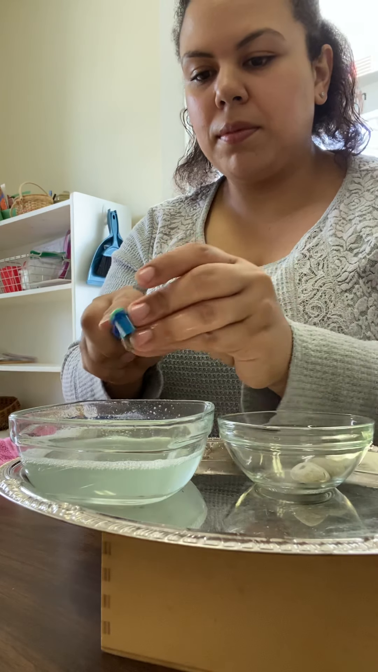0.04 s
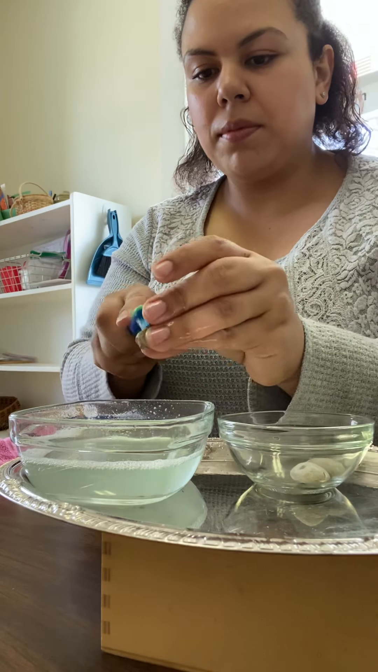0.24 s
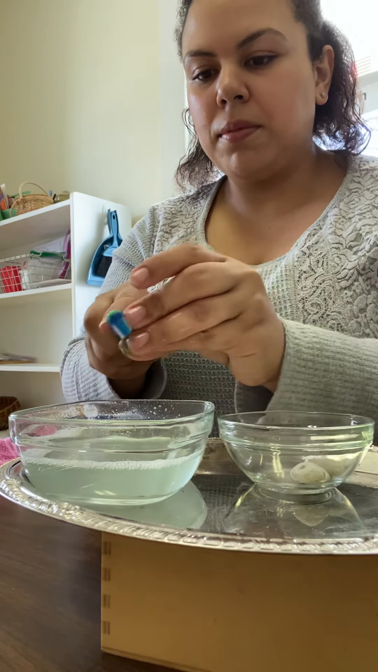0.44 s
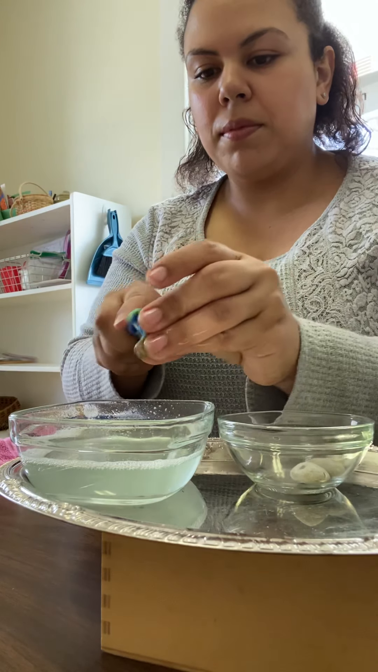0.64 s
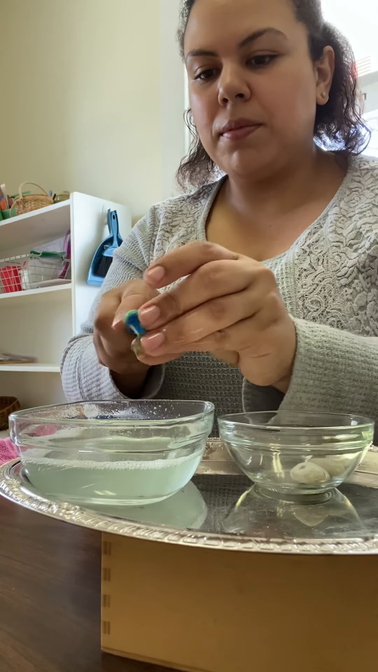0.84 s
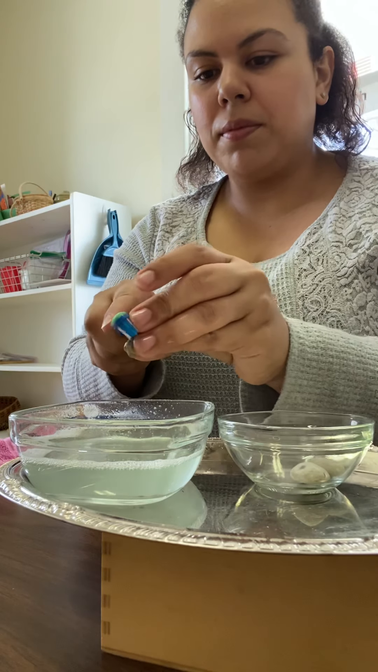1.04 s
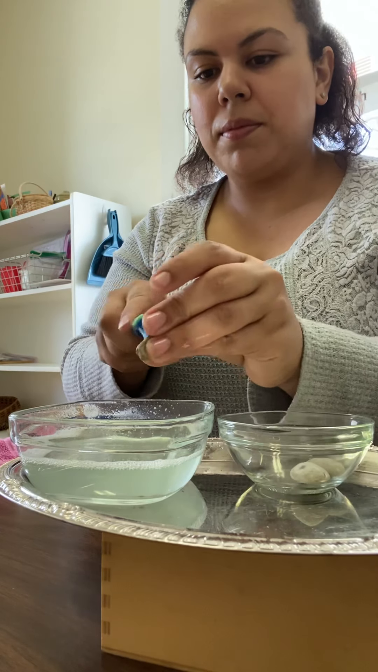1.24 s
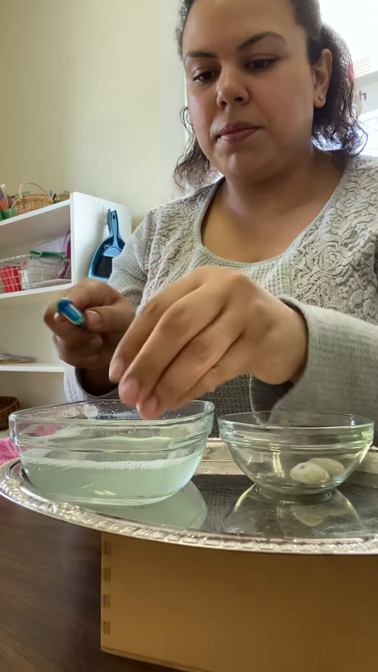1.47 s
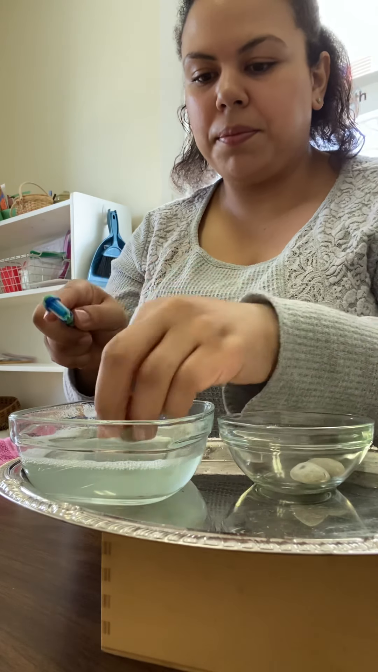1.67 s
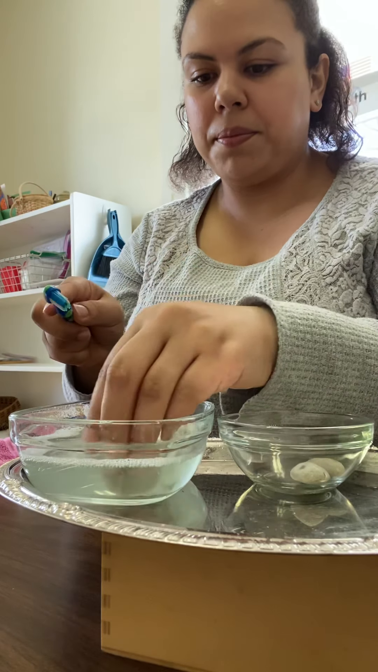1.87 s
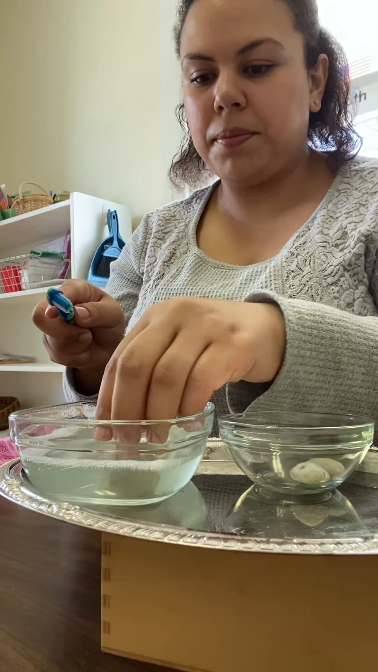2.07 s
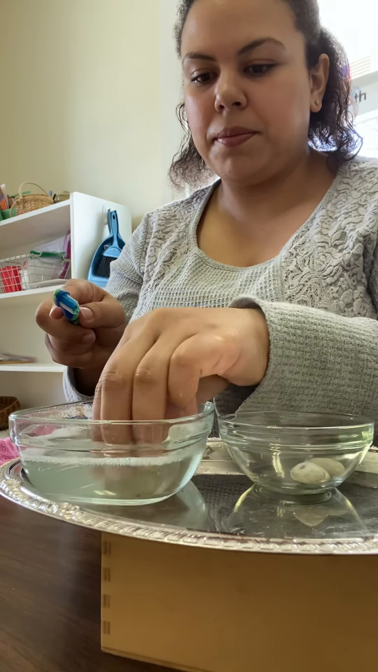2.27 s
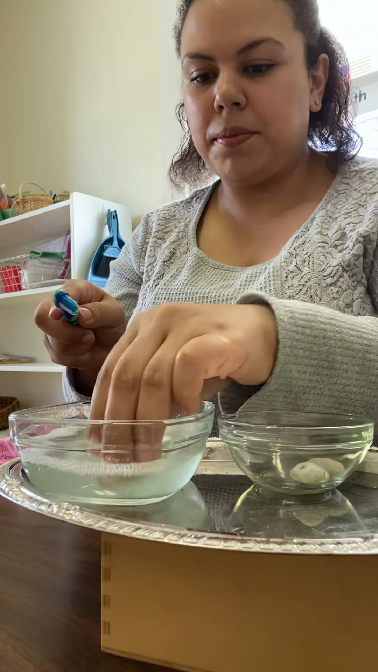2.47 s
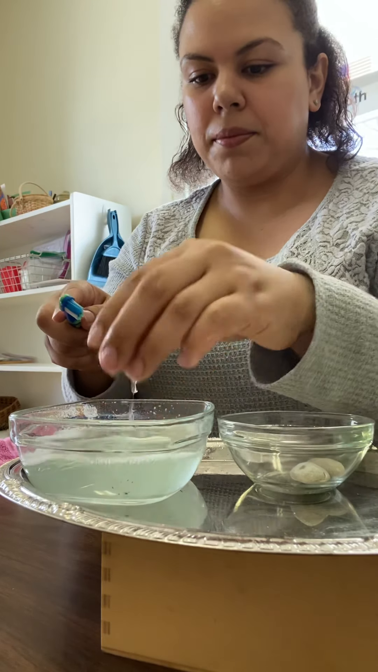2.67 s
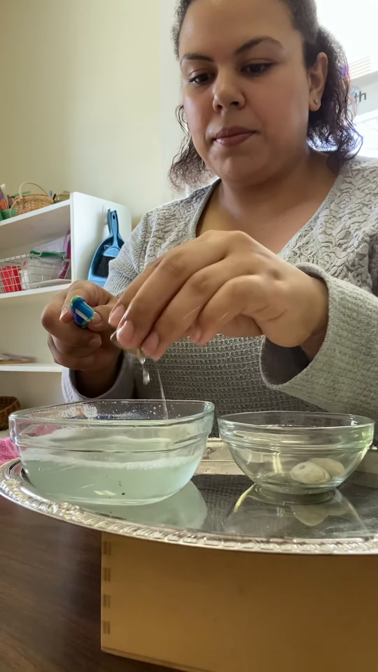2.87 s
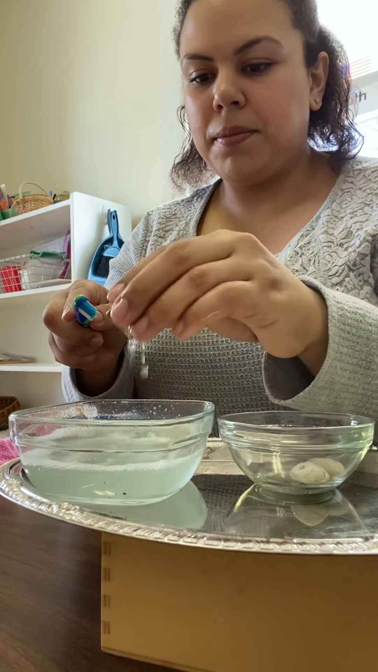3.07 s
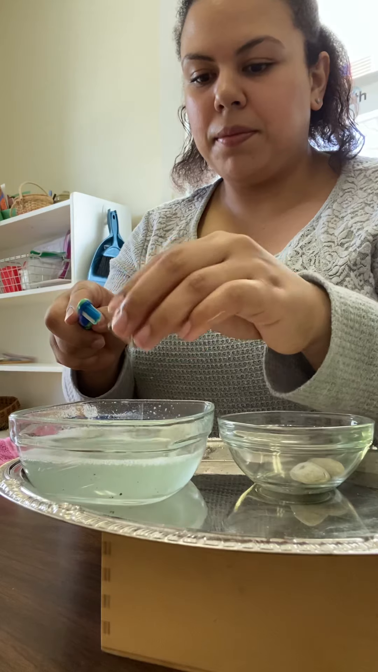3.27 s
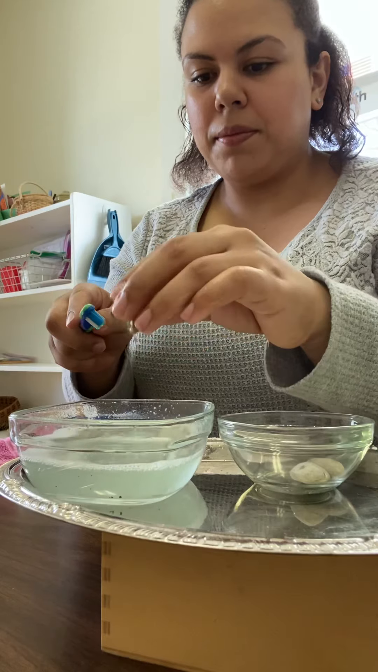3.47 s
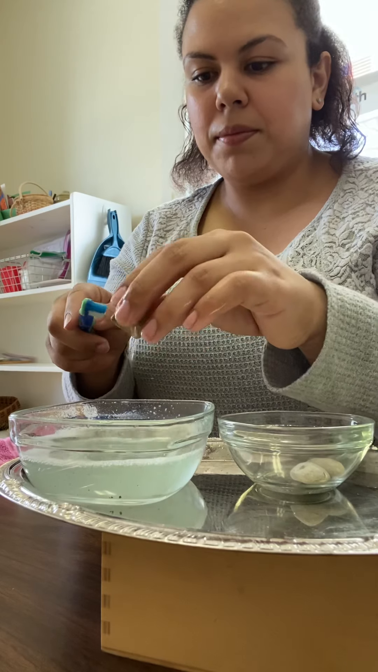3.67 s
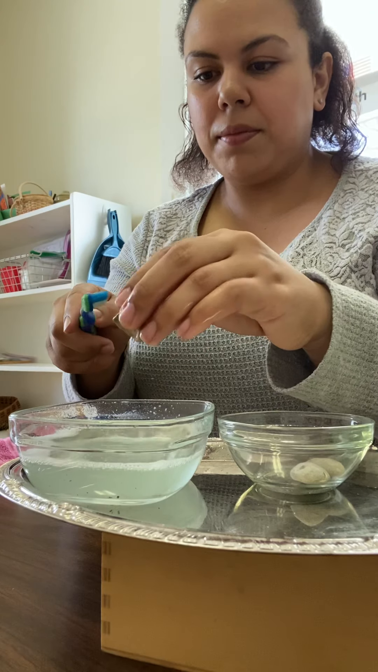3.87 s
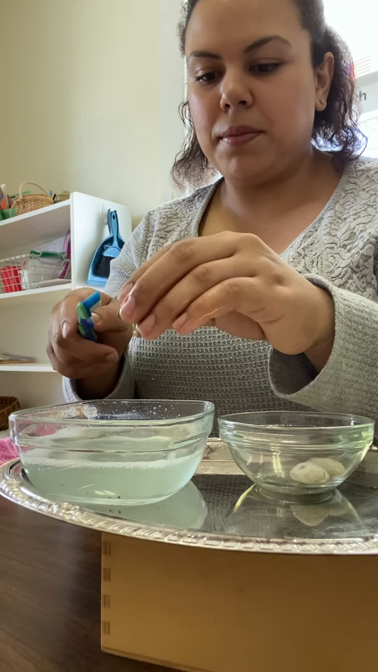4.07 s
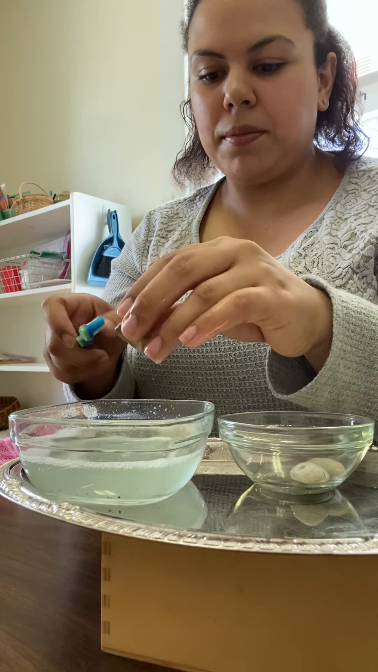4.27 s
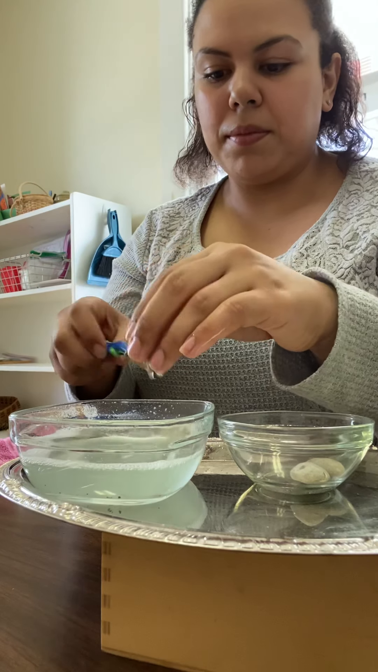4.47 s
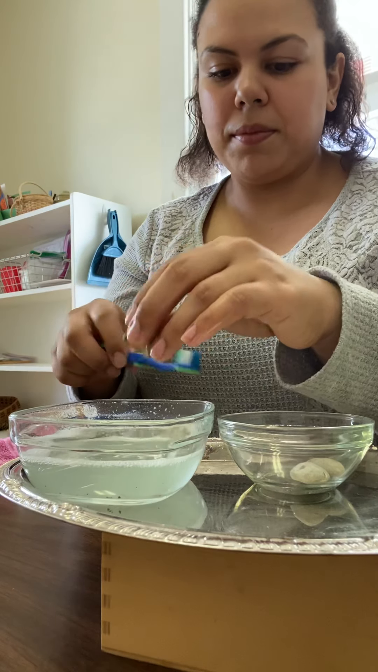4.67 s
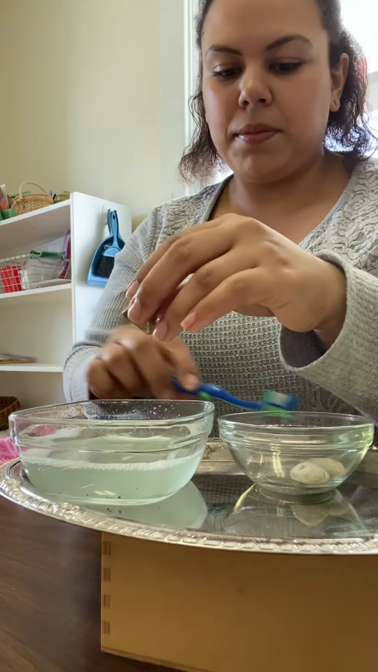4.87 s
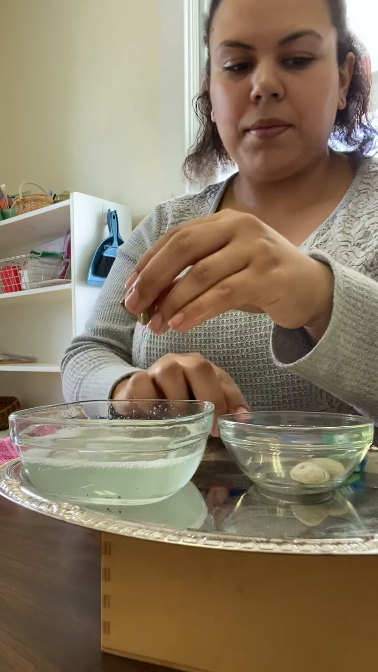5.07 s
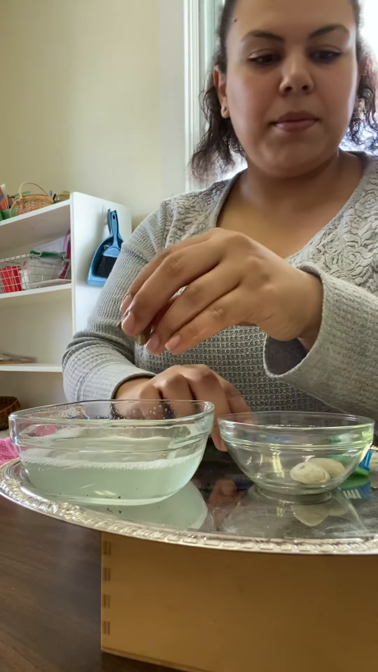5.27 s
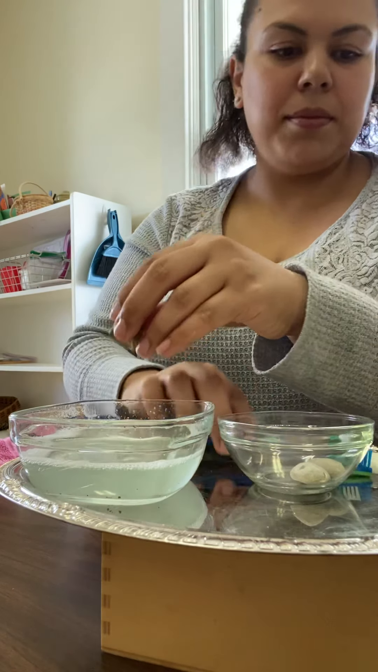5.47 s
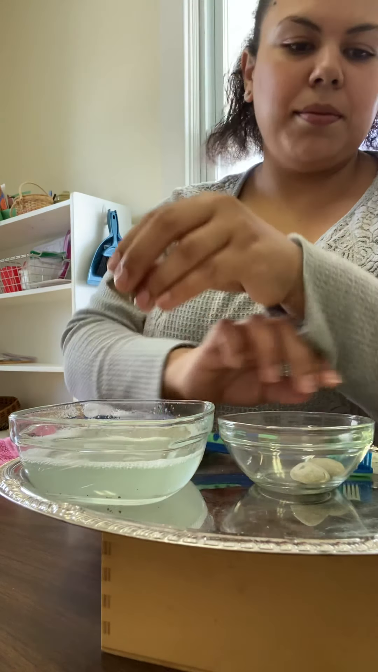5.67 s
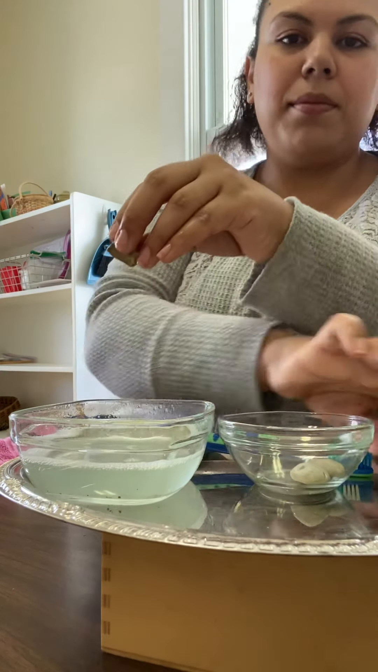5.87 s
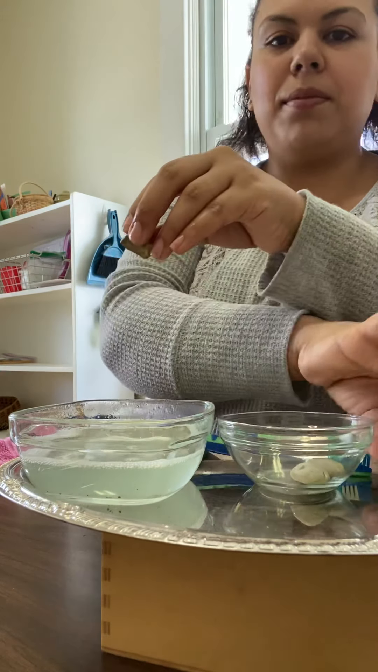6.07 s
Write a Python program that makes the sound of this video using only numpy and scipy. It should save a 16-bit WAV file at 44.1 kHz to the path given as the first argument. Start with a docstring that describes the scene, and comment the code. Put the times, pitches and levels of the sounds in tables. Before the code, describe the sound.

A quiet indoor tabletop heard closely in stereo, with slight room reverberation. From 0 to 1.35 s a wet toothbrush scrubs a small rock: about nine quick alternating strokes, airy bristle hiss with a faint stony rasp. At 1.73 s the rock clinks brightly on a glass bowl, a weaker tap at 1.8, then a rapid chatter from 1.93 to 2.0 and faint taps until 2.35. Water heaves low and small bubbles rise, fading by 2.5. Tiny drips tick at 2.7 and a crisper one at 2.9. A distant engine revs up from 2.7, holds around 4 to 5, then eases, over a growing low rumble. At 4.97 the plastic brush clacks loudly on a ringing metal tray, with rattles, then thuddy knocks at 5.35 and 5.5. A sleeve swishes and rubs from 5.8 to the end. A barely audible swish pulses each second.

```python
"""A wet toothbrush scrubs a small rock in quick strokes, close by in a small room: shaped friction grains.
The rock clinks on a glass bowl (decaying modes, clicks) as water heaves and bubbles (noise, rising sines).
Drips tick; the brush lands on a metal tray (modes, thuds, clacks); a sleeve slides away (friction grains).
Under it: a distant engine (sine orders through resonances), a rumble that grows and faint air (noise),
and a faint noise swish once a second."""
import sys
import numpy as np
from scipy import signal
from scipy.fft import rfft, irfft, next_fast_len
from scipy.io import wavfile
from scipy.ndimage import uniform_filter1d

SR = 44100
rng = np.random.default_rng(int(sys.argv[2]) if len(sys.argv) > 2 else 0)


def to_wav(s):
    """Save 16-bit WAV."""
    ch = np.atleast_2d(s).T  # columns
    pcm = np.round(np.clip(ch, -1, 1) * 32767)  # PCM
    wavfile.write(sys.argv[1], SR, pcm.astype(np.int16))


N = 270333  # samples


def amp(db):
    """Decibels to gain."""
    return 10 ** (np.asarray(db) / 20)


def unit(x):
    """Scale to rms 1."""
    return x / np.sqrt(np.mean(x ** 2) + 1e-20)


def along(points, hz):
    """Read (f/Hz, value) points on a log frequency axis."""
    f, v = np.transpose(points)
    return np.interp(np.log(hz + 1), np.log(f + 1), v)


def curves(rows):
    """One value per sample for each column after the time."""
    s, *cols = np.transpose(rows)
    return [np.interp(np.arange(N) / SR, s, c) for c in cols]


def ramp(start_s, length_s):
    """A straight rise from 0 to 1."""
    return np.clip((np.arange(N) / SR - start_s) / length_s, 0, 1)


def stroke(start_s, length_s, peak):
    """Speed of a sliding movement: up to 1 at the share `peak` of its length, then back to rest."""
    progress = (np.arange(N) / SR - start_s) / length_s
    half_turns = np.interp(progress, [0, np.clip(peak, .1, .9), 1], [0, .5, 1])
    return np.abs(np.sin(np.pi * half_turns))


def wobble(rows, size, per_second):
    """Random curves, straight between normally distributed knots."""
    knots = rng.standard_normal((rows, int(size * per_second / SR) + 4))
    at = np.arange(size) * per_second / SR
    return np.array([np.interp(at, np.arange(len(k)), k) for k in knots])


def filtered(x, response):
    """Multiply the spectrum of x by a response of frequency."""
    n = x.shape[-1]
    m = next_fast_len(n + SR // 8)
    return irfft(rfft(x, m) * response(np.fft.rfftfreq(m, 1 / SR)), m)[..., :n]


def colour(x, spectrum):
    """Shape x by a relative spectrum, at rms 1."""
    return unit(filtered(x, lambda hz: amp(along(spectrum, hz))))


def stress(x, centre_hz, boost_db, octaves):
    """Favour the resonances near one frequency, at rms 1."""
    def bump(hz):
        distance = np.log2((hz + 1) / centre_hz) / octaves
        return amp(boost_db * np.exp(-distance ** 2))
    return unit(filtered(x, bump))


def noise(spectrum, size, alike=0):
    """Coloured stereo noise with a given left-right likeness."""
    share = np.clip(alike, 0, 1)
    common = np.sqrt(share) * rng.standard_normal(size)
    separate = np.sqrt(1 - share) * rng.standard_normal((2, size))
    return colour(common + separate, spectrum)


def grains(spectrum, per_second, smooth):
    """Friction: tiny flicks of random size over finer ones; their colour shifts from spot to spot."""
    flicks = (rng.random(N) < per_second / SR) * rng.standard_normal((2, N))
    z = signal.stft(unit(flicks) + smooth * rng.standard_normal((2, N)), nperseg=256)[2]
    spots = uniform_filter1d(rng.standard_normal(z.shape[1:]), size=4, axis=0)  # over frequency
    spots = uniform_filter1d(spots, size=20, axis=1)  # over time
    patchy_db = 2.0
    patchy = signal.istft(z * amp(patchy_db * unit(spots)), nperseg=256)[1]
    return colour(patchy[:, :N], spectrum)


def ring(modes, t, tilt_db, damping, waver):
    """Modes struck at new strengths; whatever rests on them damps them and makes their phases waver."""
    hz, db, t60 = np.transpose(modes)[:, :, None]
    level = db + tilt_db * np.log2(hz / np.median(hz)) + rng.standard_normal(hz.shape)
    phase = 2 * np.pi * rng.random(hz.shape) + waver * hz / hz[-1] * wobble(len(hz), len(t), per_second=160)
    # radians each way; long waves reach both microphones more alike
    apart = np.minimum(hz / 1000, 1) * rng.uniform(0.17, 1.0, hz.shape) * rng.choice([-1, 1], hz.shape)
    wave = amp(level - 60 * t * damping / t60) * np.exp(1j * (2 * np.pi * hz * t + phase))
    return (np.exp(1j * np.array([[1], [-1]]) * apart.T) @ wave).imag


def add(track, s, sound):
    """Mix a sound in at time s."""
    part = track[:, round(s * SR):][:, :sound.shape[1]]
    part += sound[:, :part.shape[1]]


def room(x, wet_db):
    """Direct sound plus the walls' answer 4 ms later: noise decaying at its own rate in each band."""
    # reverberation: f/Hz, t60/s
    decay = [(150, 0.24), (600, 0.72), (2500, 0.59), (5000, 0.56), (8000, 0.28), (13000, 0.21)]
    hz, t, z = signal.stft(rng.standard_normal((2, 3 * SR // 4)), SR, nperseg=256)
    tail = signal.istft(z * amp(-60 * t / along(decay, hz)[:, None]), SR, nperseg=256)[1]
    tail = np.pad(tail / np.linalg.norm(tail[0]), ((0, 0), (SR // 250, 0)))
    return x + amp(wet_db) * signal.fftconvolve(x, tail, axes=1)[:, :N]


def lean(x, left_db):
    """Make the left side louder than the right by left_db."""
    return x * amp([[left_db / 2], [-left_db / 2]])


def background():
    """Low rumble of the house and street, growing with the traffic, and faint air."""
    # rumble spectrum: f/Hz, relative level/dB
    low_spectrum = [(20, -38.5), (38, -10.5), (60, -10.5), (107, -5.5), (170, -8.5), (255, -8),
                    (330, -14.5), (530, -29), (1000, -51), (2000, -63.5)]
    # air spectrum: f/Hz, relative level/dB
    air_spectrum = [(100, -6), (500, 10.5), (1000, 7), (2000, -3), (4000, -5.5), (8500, -11), (12500, -12),
                    (15000, -25)]
    rumble_db, growth_db, growth_from_s, growth_s = -67.5, 11.5, 2.05, 4.2
    unsteady_db = -1.05
    level_db = rumble_db + growth_db * ramp(growth_from_s, growth_s)
    level_db = level_db + unsteady_db * wobble(1, N, per_second=5)
    rumble = amp(level_db) * noise(low_spectrum, N, alike=1.0)
    return lean(rumble, left_db=5.0) + amp(-77.0) * noise(air_spectrum, N, alike=.2)


def engine():
    """A distant engine revs up, holds and eases off; low orders boom on crossing room resonances."""
    # engine speed: t/s, turn rate/Hz
    speed = [(2.6, 38), (2.87, 42.8), (3.12, 48.2), (3.65, 53), (4.05, 54.3), (4.95, 54.3), (5.45, 53),
             (6.13, 48.5)]
    # engine orders: multiple of the turn rate, level ahead of the resonances/dB
    orders = [(1, -52), (2, -47.5), (3, -51), (4, -62.5), (5, -62)]
    # room resonances: f/Hz, width/Hz, peak gain/dB
    resonances = [(111.4, 8.5, 1.5), (128.1, 6.4, -5), (144.2, 4.4, -6), (161.3, 3.3, -11.5)]
    on_s, rise_s, leave_s, fade_db_per_s = 2.67, 0.16, 4.95, 2
    leak_db = -19  # passes between the resonances
    turn_hz, = curves(speed)
    angle = 2 * np.pi * np.cumsum(turn_hz) / SR
    out = np.zeros(N)
    for order, db in orders:
        boom = np.zeros(N)
        for hz, width_hz, peak_db in resonances:
            boom += amp(peak_db) / (1 + (2 * (order * turn_hz - hz) / width_hz) ** 2)
        out += amp(db) * np.hypot(boom, amp(leak_db)) * np.sin(order * angle)
    leaving_db = -fade_db_per_s * np.maximum(np.arange(N) / SR - leave_s, 0)
    return lean(np.sqrt(2) * out * ramp(on_s, rise_s) * amp(leaving_db), left_db=2)


def pulsing():
    """Something across the room swishes softly once a second: noise under a half-sine swell."""
    # swish spectrum: f/Hz, relative level/dB
    pulse_spectrum = [(250, -18), (550, 4), (1000, 3.5), (1500, -2), (2300, -10), (2950, 1.5), (3400, -7),
                      (4200, -4.5), (5000, -13), (6500, -17), (9000, -48)]
    first_s, every_s, length_s, level_db = .01, 1.002, .14, -69.5
    swell = sum(stroke(s, length_s, peak=.5) for s in np.arange(first_s, N / SR, every_s))
    return room(amp(level_db) * swell * noise(pulse_spectrum, N, alike=0.25), wet_db=-1.5)


def sleeve():
    """A knitted sleeve swishes and rubs over the table as the arm draws back: slides rise and die away."""
    # slides: start t/s, rise/s, t60/s, rub level/dB, swish level/dB
    slides = [(5.822, .022, 0.45, -63.5, -56), (5.995, 0.0493, 0.067, -46.5, -62)]
    # rub spectrum: f/Hz, relative level/dB
    rub_spectrum = [(200, -13), (500, 9.5), (1000, 6), (2600, 2.5), (4000, -4), (8000, -26)]
    # swish spectrum: f/Hz, relative level/dB
    swish_spectrum = [(2000, -20), (4000, -9.5), (6000, -2), (9000, -7.5), (12500, -10.5), (15000, -30)]
    # forearm's rumble on the table: f/Hz, relative level/dB
    arm_spectrum = [(35, -16.5), (60, 9.5), (150, 2.5), (240, 5.5), (400, -24), (900, -49)]
    arm_db, catching_db = -49.5, 2.5
    t = np.arange(N) / SR
    rub, swish, weight = np.zeros((3, N))
    for s, rise_s, t60_s, rub_db, swish_db in slides:
        speed = ramp(s, rise_s) ** 2 * amp(-60 * np.maximum(t - s - rise_s, 0) / t60_s)
        rub += amp(rub_db) * speed
        swish += amp(swish_db) * speed
        weight += amp(arm_db) * np.sqrt(speed)
    cloth = rub * grains(rub_spectrum, per_second=430, smooth=0.95)
    cloth = cloth + swish * grains(swish_spectrum, per_second=2200, smooth=1.0)
    cloth = cloth * amp(catching_db * wobble(1, N, per_second=90))
    return room(cloth, wet_db=-3.0) + weight * noise(arm_spectrum, N, alike=0.82)


def drips():
    """Drops and wet fingers make short narrow ticks: decaying band noise."""
    # ticks: t/s, level/dB, centre f/Hz, width/centre, t60/s
    ticks = [(.423, -61, 9000, 0.37, .015), (2.678, -65, 6400, 0.42, 0.038),
             (2.696, -59.5, 4730, 0.36, 0.045), (2.695, -57.5, 3170, 0.11, 0.1),
             (2.70, -62, 2390, 0.13, 0.11), (2.911, -42.5, 9940, 0.22, 0.025), (6.001, -50, 6340, 1, 0.037)]
    out, t = np.zeros((2, N)), np.arange(SR // 4) / SR
    for s, db, centre_hz, width, t60_s in ticks:
        def band(hz):
            return 1 / (1 + ((hz / centre_hz - 1) / width) ** 2) ** 2
        tick = unit(filtered(rng.standard_normal((2, len(t))), band))
        add(out, s, amp(db - 60 * t / t60_s) * tick)
    return room(out, wet_db=-7.5)


def tray():
    """Hard plastic clacks on the tray, which rings and thumps the table beneath."""
    # brush and hand on the tray: t/s, table thud level/dB, thud's favoured f/Hz, tray ring level before
    # a 6 dB cut/dB, ring tilt/(dB/octave), clack level/dB, clack's favoured f/Hz
    knocks = [(4.9666, -25, 230, -23.5, 4.5, -12, 3790), (4.987, -29.5, 177, -30, -0.5, -26, 4200),
              (5.016, -34.5, 252, -46.5, -9.5, -41, 4200), (5.04, -34, 840, -34.5, -3.5, -38, 3440),
              (5.346, -21.5, 590, -48.5, 0.5, -34.5, 5270), (5.4903, -25, 1730, -32.5, -5, -22, 7000),
              (5.949, -44.5, 230, -64, -3.5, -62, 2470)]
    # metal tray modes: f/Hz, relative level/dB, t60 before damping/s
    tray_modes = [(333, -19, .5), (767, -11, .22), (830, -8, .28), (965, -13, .35), (1201, -7, .28),
                  (1579, -4, .3), (1643, -1, .3), (1834, -9, .3), (2399, -3, .36), (2585, 2, .38),
                  (2998, -2, .2), (3262, -2, .3), (3637, -1, .28), (3686, -3, .28), (3984, -1, .24),
                  (4210, -2, .3), (4340, -3, .33), (4447, -4, .32), (4818, -5, .28), (5283, -3, .25),
                  (5850, -3, .25), (6578, -6, .23), (7130, -2, .12), (7490, 0, .12), (8210, -5, .1)]
    # table thud spectrum: f/Hz, relative level/dB
    thud_spectrum = [(40, -36), (100, -17.5), (160, -5), (215, 5.5), (270, 4), (350, -3), (550, -12),
                     (780, -6), (1050, -8.5), (1600, -11.5), (2200, -19.5), (5000, -49.5), (9000, -65.5)]
    # plastic clack spectrum: f/Hz, relative level/dB
    clack_spectrum = [(100, -48.5), (500, -24.5), (1000, 6), (1600, -14), (2050, 0), (2600, 3.5), (4300, 5),
                      (6000, 5), (7500, -1.5), (9200, -2.5), (10800, -10.5), (12500, -13), (16000, -38.5)]
    # handle's chatter within a blow: delay/s, relative level/dB
    chatter = [(.0008, -1.5), (.0032, -7.5), (.0068, -7.5)]
    out, t = np.zeros((2, N)), np.arange(2 * SR // 3) / SR
    contact = 1 - np.exp(-t / 0.00042)
    for s, thud_db, thud_hz, ring_db, tilt_db, clack_db, clack_hz in knocks:
        wood = stress(noise(thud_spectrum, len(t), alike=0.67), thud_hz, boost_db=6.5, octaves=0.6)
        thud = amp(thud_db - 60 * t / 0.12) * (1 - np.exp(-t / 0.0034)) * wood
        plastic = stress(noise(clack_spectrum, len(t), alike=0.014), clack_hz, boost_db=6.5, octaves=0.25)
        crack = sum((t >= delay) * amp(db - 60 * np.abs(t - delay) / 0.0049) for delay, db in chatter)
        # shimmer of many close sheet-metal modes, as noise with two decays
        shimmer = amp(-2.0 - 60 * t / 0.043) + amp(-16.5 - 60 * t / 0.054)
        clack = amp(clack_db) * (crack + shimmer) * plastic
        metal = amp(ring_db - 6.0) * ring(tray_modes, t, tilt_db, damping=1.49, waver=1.0)
        add(out, s, lean(thud, left_db=2.0) + contact * (clack + metal))
    return lean(room(out, wet_db=-8.5), left_db=1.06)


def slosh(start_s, length_s):
    """A low heave of water as the rock is swirled: noise that swells fast and sinks slowly."""
    # heave spectrum: f/Hz, relative level/dB
    slosh_spectrum = [(40, -17), (70, -4.5), (130, -5.5), (205, 2), (300, -7.5), (550, -10), (1200, -25.5),
                      (3000, -43.5)]
    heave = stroke(start_s, length_s, peak=.15) ** 2
    return amp(-59) * heave * noise(slosh_spectrum, N, alike=0.84)


def water(start_s, length_s, count=44):
    """Fingers stir the water: small bubbles ring and rise in pitch, weaker as the stirring slows."""
    low_hz, high_hz, level_db = 750, 2400, -46.5
    cycles = 24  # periods of the starting pitch in a 60 dB decay
    out, t = np.zeros((2, N)), np.arange(SR // 12) / SR
    for when, size, strength in rng.random((count, 3)):
        hz = low_hz * (high_hz / low_hz) ** size
        age = t * hz / cycles
        tone = np.sin(2 * np.pi * hz * t * (1 + .12 * age))
        bubble = tone * amp(-60 * age) * (1 - np.exp(-t / 0.0018))
        gain = amp(level_db - 18 * strength - 10 * when)
        add(out, start_s + length_s * when, gain * np.array([bubble, bubble]))
    return room(out, wet_db=-0.5)


def bowl():
    """The rock taps and chatters on the glass: a stony click and the modes that the spot excites."""
    # rock on the bowl: t/s, ring level/dB, ring tilt/(dB/octave), click level/dB, place (0 wall, 1 bottom)
    clinks = [(1.7313, -14.5, -2, -25, 0), (1.7952, -28.5, -10.5, -29.5, 0), (1.932, -17.5, -1.5, -24, 1),
              (1.9415, -17, 11, -29, 0), (1.961, -33, 2, -35.5, 1), (1.979, -36, -10, -31, 0.0068),
              (2.012, -44, 4, -37, 1), (2.155, -34, -2, -33, 0.089), (2.344, -47, -2, -45, 0.48)]
    # glass modes: f/Hz, level struck on the wall/dB, level struck on the bottom/dB, t60 before damping/s
    glass_modes = [(3190, -16, -11, .08), (3332, -1.5, -4.5, .15), (3501, -16, -1, .13),
                   (3651, -6, -17, .11), (5114, -4, -11, .13), (5549, -28, -16, .26), (6333, -24, -15, .15),
                   (6466, -13, -21, .2), (7770, -12, -11, .12), (7850, -16, -14, .1),
                   (10158, -30, -21, .05), (10790, -20, -15, .04), (11500, -24, -13, .06),
                   (11760, -21, -19, .06), (12250, -23, -21, .06)]
    # click spectrum: f/Hz, relative level/dB
    click_spectrum = [(50, -37), (200, -12), (400, -11), (800, -17), (1700, -5), (2400, -4.5), (3200, 1),
                      (4400, -5.5), (6500, -1.5), (8800, -18), (11500, -14.5), (13000, -20.5),
                      (15500, -26.5)]
    out, t = np.zeros((2, N)), np.arange(SR // 2) / SR
    contact = 1 - np.exp(-t / 0.00036)
    hz, wall_db, bottom_db, t60_s = np.transpose(glass_modes)
    for s, ring_db, tilt_db, click_db, place in clinks:
        mode_db = wall_db + np.clip(place, 0, 1) * (bottom_db - wall_db)
        modes = np.transpose([hz, mode_db, t60_s])
        click = amp(click_db - 60 * t / 0.037) * noise(click_spectrum, len(t), alike=0.6)
        glass = amp(ring_db) * ring(modes, t, tilt_db, damping=1.12, waver=1.8)
        add(out, s, contact * (glass + click))
    return lean(room(out, wet_db=-8.5), left_db=1.5)


def scrubbing():
    """Each stroke bends the bristles, which flick over the stone; between strokes they barely drag."""
    # brush strokes, pull and push in turn: start t/s, length/s, peak bristle level/dB
    strokes = [(-.08, 0.19, -60), (.065, 0.19, -54), (.295, .16, -56), (.44, .16, -51.5),
               (.625, 0.15, -54.5), (.77, .18, -55.5), (.975, 0.112, -54), (1.09, 0.23, -56),
               (1.225, .13, -58.5)]
    # bristle hiss spectrum: f/Hz, relative level/dB
    bristle_spectrum = [(3000, -26), (5500, -7.5), (7500, -0.5), (9500, 0.5), (10800, 1.5), (12500, 3.5),
                        (13800, -5), (15000, -15), (16000, -33)]
    # stone rasp spectrum: f/Hz, relative level/dB
    rasp_spectrum = [(130, 1), (300, 9), (600, -14.5), (900, -12), (2000, 1), (3000, -2.5), (4300, 5),
                     (5300, 0.5), (6500, 0), (9000, -14.5), (14000, -40)]
    fastest_at = .42  # share of a stroke
    pull_rasp_db, push_rasp_db = -13.5, -8  # relative to the hiss; a push digs in harder
    drag_db, drag_rasp_db, lift_off_s, lift_s = -70.5, -9, 1.35, .07
    hiss_power, rasp_power = np.zeros((2, N))
    for k, (s, length_s, db) in enumerate(strokes):
        force = amp(db) * stroke(s, length_s, fastest_at) ** 1.6
        rasp_db = push_rasp_db if k % 2 else pull_rasp_db
        hiss_power += force ** 2
        rasp_power += (force * amp(rasp_db)) ** 2
    drag = amp(drag_db) * (1 - ramp(lift_off_s - lift_s, lift_s))
    hiss_level = np.sqrt(hiss_power + drag ** 2)
    rasp_level = np.sqrt(rasp_power + (amp(drag_rasp_db) * drag) ** 2)
    bristles = hiss_level * grains(bristle_spectrum, per_second=2600, smooth=.9)
    stone = rasp_level * grains(rasp_spectrum, per_second=1800, smooth=.8)
    return room(bristles, wet_db=-9.5) + room(stone, wet_db=-7.0)


def scene():
    """Everything at the table, over the background."""
    stir_s, stir_length_s = 1.93, 0.6  # the hand heaves the water in the bowl
    far = background() + engine() + pulsing()
    wet = drips() + slosh(stir_s, stir_length_s) + water(stir_s, stir_length_s)
    return far + sleeve() + tray() + wet + bowl() + scrubbing()


def record(dry):
    """The microphone pair shares treble between its sides, shifts its phase and cuts off above 16 kHz."""
    # left's share in the right: f/Hz, share 0-1
    pair_alike = [(400, 0), (1500, .35), (6200, .45), (7600, .86), (14000, .86)]
    # phase by which the right is delayed: f/Hz, phase/rad
    pair_phase = [(400, 0), (1400, -2), (4000, -2), (5500, -2.8), (7000, -.5), (8600, .1), (10400, 3.1),
                  (12300, 6.1), (13600, 6.4), (14800, 9.4)]
    top_hz = 16000

    def alike(hz):
        return np.clip(along(pair_alike, hz), 0, 1)

    left, right = dry
    right = filtered(left, alike) + filtered(right, lambda hz: np.sqrt(1 - alike(hz) ** 2))
    right = filtered(right, lambda hz: np.exp(-1j * along(pair_phase, hz)))
    return filtered(np.array([left, right]), lambda hz: 1 / (1 + (hz / top_hz) ** 80))


dry = scene()
out = record(dry)
to_wav(out)
```